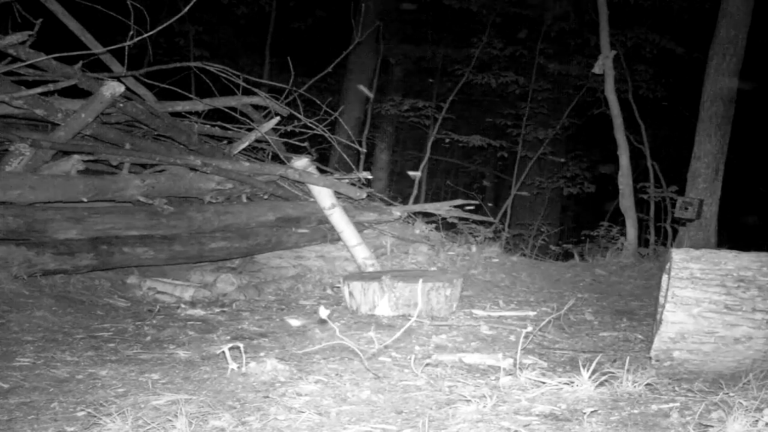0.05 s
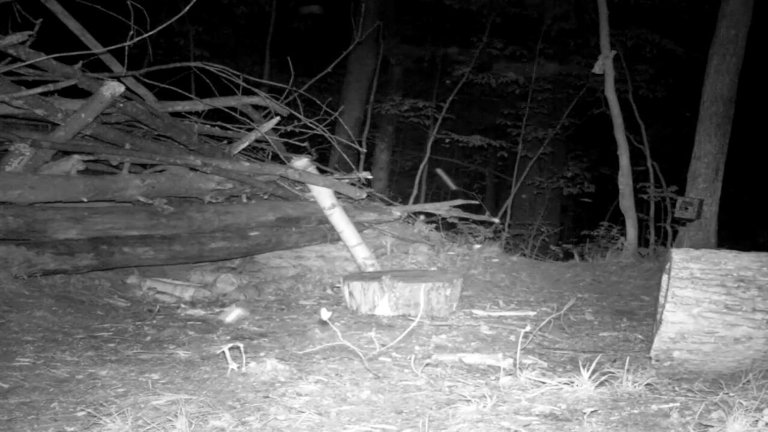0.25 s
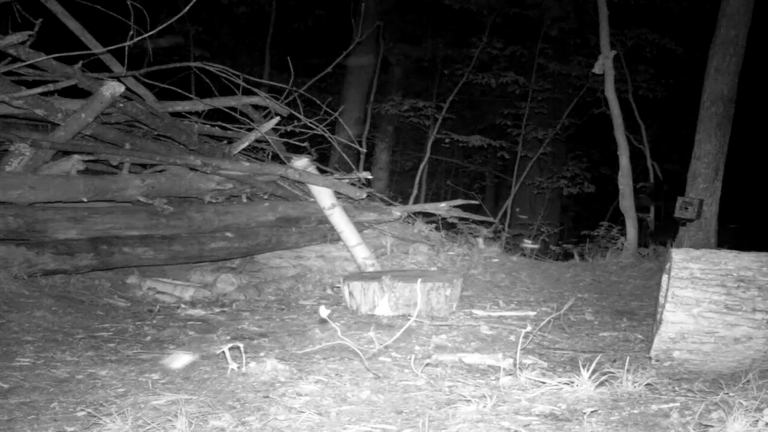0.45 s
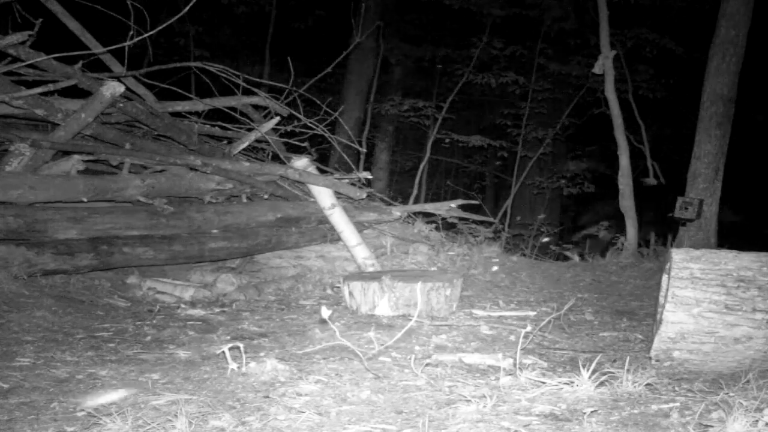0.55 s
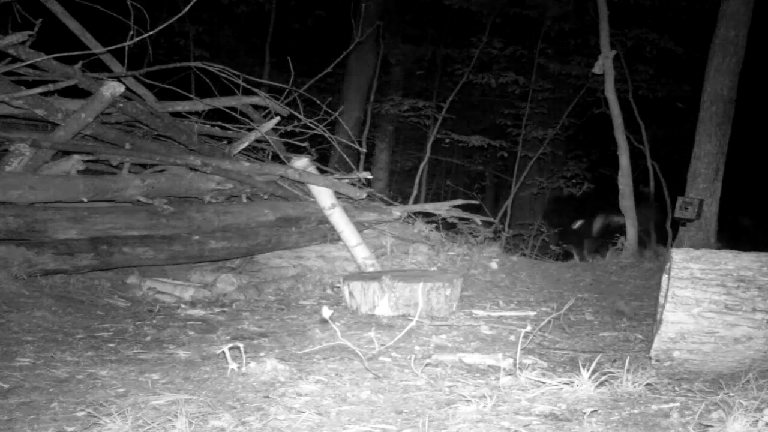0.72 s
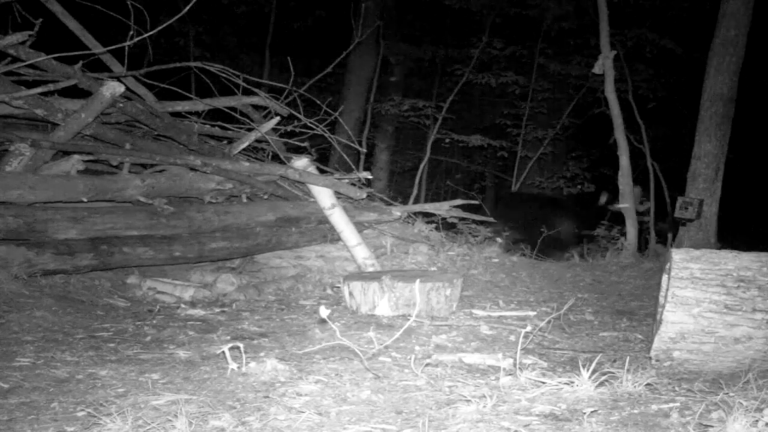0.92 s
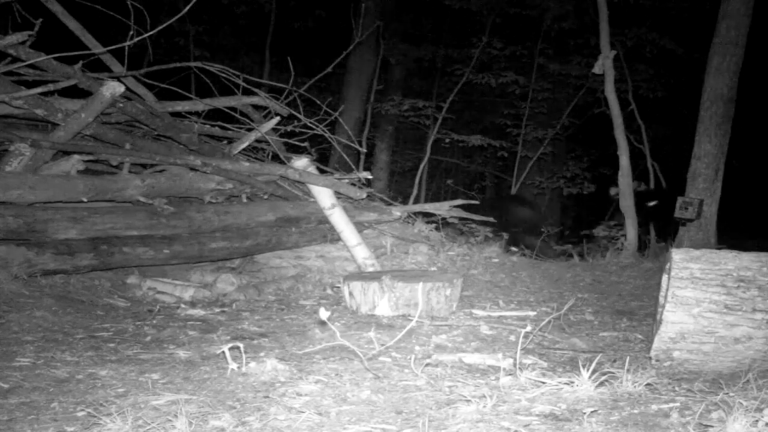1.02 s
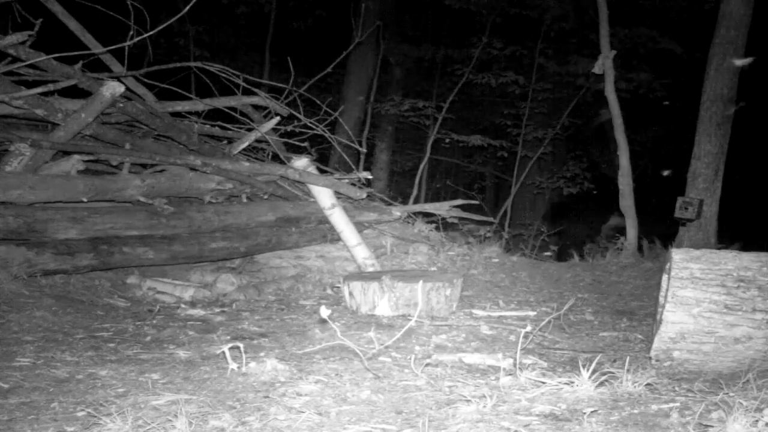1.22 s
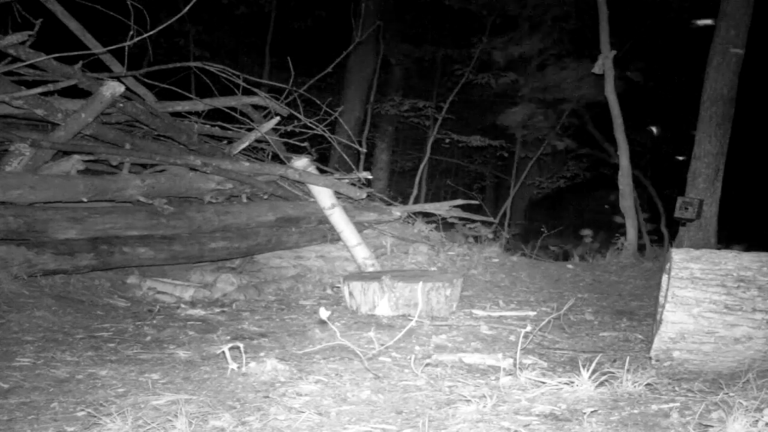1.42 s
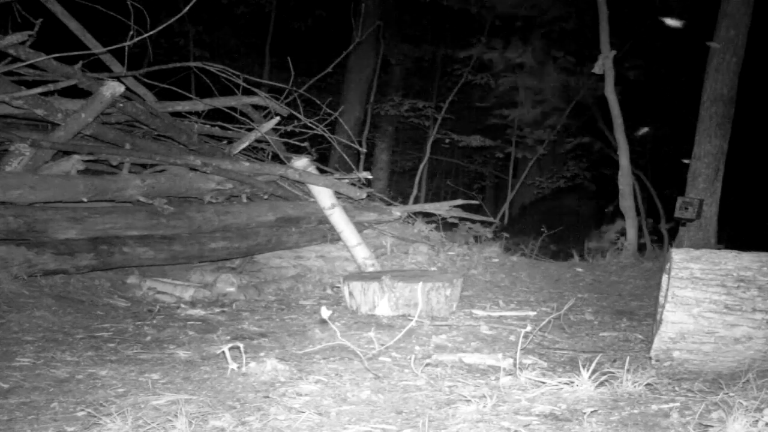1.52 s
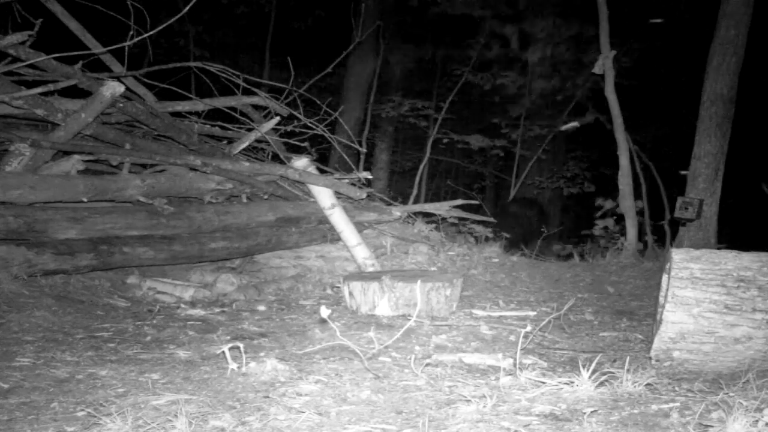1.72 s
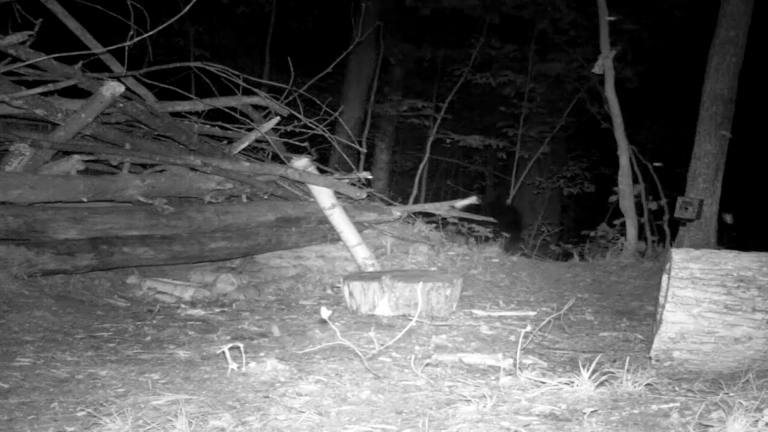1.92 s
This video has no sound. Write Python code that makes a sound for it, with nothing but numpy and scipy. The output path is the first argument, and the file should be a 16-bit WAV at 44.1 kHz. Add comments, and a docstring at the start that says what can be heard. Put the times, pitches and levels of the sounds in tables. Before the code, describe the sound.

One low, raspy bear growl, followed by snapping twigs, thudding paws and rustling leaves.

```python
"""Edge of a night forest: a bear gives one short rough growl and lunges through the brush.
Its vocal folds flap unevenly and ring the throat in the growl and in short grunts. Paws thud on
the ground and crush dry leaves, twigs snap, sticks knock and shaken branches rustle on.
Behind it: a steady insect chorus, a low rumble and the hiss of a small outdoor camera."""
import sys
import numpy as np
from scipy import signal
from scipy.fft import rfft, irfft
from scipy.io import wavfile

SR = 44100
rng = np.random.default_rng(int(sys.argv[2]) if len(sys.argv) > 2 else 0)


def transcribe(u):
    """Save the signal u as a 16-bit wav file named by the first command-line argument.

    u: samples, shape (n,) or (channels, n), limited to [-1, 1]; the rate is SR.
    q: integer samples, one column per channel.
    """
    v = np.clip(np.atleast_2d(u).T, -1, 1)
    q = np.round(v * 32767).astype(np.int16)
    wavfile.write(sys.argv[1], SR, q)


N = 85995
T = np.arange(N) / SR


def amp(db):
    """Decibels to gain."""
    return 10 ** (np.asarray(db) / 20)


def unit(x):
    """Scale to rms 1."""
    return x / np.sqrt(np.mean(x ** 2) + 1e-20)


def curve(rows, column=1):
    """One column of a time table, linearly interpolated."""
    rows = np.array(rows)
    return np.interp(T, rows[:, 0], rows[:, column])


def colour(x, spectrum, tilt_db_per_oct=0):
    """Minimum-phase filter of unit energy; the tilt acts above 1 kHz."""
    hz = np.maximum(abs(np.fft.fftfreq(8192, 1 / SR)), 5)
    freq_hz, gain_db = np.transpose(spectrum)
    tilt_db = tilt_db_per_oct * np.log2(np.maximum(hz, 1000))
    log_gain = np.log(amp(np.interp(np.log(hz), np.log(freq_hz), gain_db) + tilt_db))
    taps = np.fft.ifft(np.exp(signal.hilbert(log_gain).conj())).real[:4096]
    return signal.fftconvolve(x, taps / np.linalg.norm(taps))[:N]


def band(centre_hz, width_hz):
    """Noise in one steep resonance, rms 1; a random waver when centred on 0 Hz."""
    detune = 2 * (np.fft.rfftfreq(N, 1 / SR) - centre_hz) / width_hz
    return unit(irfft(rfft(rng.standard_normal(N)) / (1 + detune ** 2) ** 1.5, N))


def swell(start_s, rise_s, decay_s):
    """Linear rise, exponential fall."""
    age_s = T - start_s
    return np.clip(age_s / rise_s, 0, 1) * np.exp(-np.maximum(age_s - rise_s, 0) / decay_s)


def crackle(per_s, spread_db):
    """Random tiny clicks of uneven size, rms 1."""
    size = amp(spread_db * np.minimum(rng.exponential(1, N), 4))
    return unit(size * rng.choice([-1, 1], N) * (rng.random(N) < per_s / SR))


def insects():
    """Far insects trill in a high and a low chorus."""
    # chorus bands: centre_hz, width_hz, level_db
    chorus = [(3464, 140, -52.5), (3648, 450, -50.5), (2297, 490, -52)]
    return sum(amp(db + band(0, 45)) * band(hz, width_hz) for hz, width_hz, db in chorus)


def rumble_and_hiss():
    """Steady low rumble and camera hiss."""
    # noise spectrum: freq_hz, gain_db
    spectrum = [(20, 4.5), (65, 0.5), (160, -16), (280, -16.5), (500, -18), (780, -25), (1150, -15.5),
                (1700, -28.5), (2800, -26), (4600, -27), (7000, -29), (11000, -31.5), (15500, -34)]
    return amp(-44) * colour(rng.standard_normal(N), spectrum)


def leaves():
    """Crushed dry leaves break in bursts of small clicks."""
    # bursts: start_s, level_db, rise_s, decay_s, tilt_db_per_oct
    crunches = [(0.107, -42.5, 0.0022, 0.0061, 7), (0.247, -33.5, .001, 0.0085, 9),
                (0.26, -32, 0.0015, 0.015, 9.5), (.694, -32, 0.002, 0.013, 0.5),
                (0.708, -31, 0.0036, 0.016, -0.5), (0.931, -37.5, 0.024, 0.17, -7.5),
                (0.984, -31, 0.018, 0.01, -8.5), (1.203, -38.5, 0.0049, 0.01, -3),
                (1.273, -28, 0.028, 0.036, -0.5), (1.293, -39, 0.0055, 0.013, -2),
                (1.495, -41, 0.0087, 0.017, 0.5)]
    # leaf spectrum: freq_hz, gain_db
    spectrum = [(200, 9.5), (750, -13), (1200, 1), (2800, 5.5), (5500, 6), (9500, -4), (12500, -15.5),
                (15500, -12.5)]
    out = np.zeros(N)
    for start_s, level_db, rise_s, decay_s, tilt in crunches:
        clicks = swell(start_s, rise_s, decay_s) * crackle(per_s=7000, spread_db=3)
        out += amp(level_db) * colour(clicks, spectrum, tilt)
    return out


def vocal_folds(rate_hz, noise_share):
    """Folds flap unevenly; returns cycle count, air puffs and rough pulse train."""
    jitter, spread_db, puff_decay_cycles = 0.08, 2.5, 0.45
    cycles = np.cumsum(rate_hz * (1 + jitter * band(0, 150))) / SR
    flaps = np.diff(np.floor(cycles), prepend=0) * amp(spread_db * rng.standard_normal(N).clip(-1, 1))
    puffs = unit(0.9 + np.exp(-(cycles % 1) / puff_decay_cycles))
    voiced = np.sqrt(1 - noise_share) * unit(flaps - flaps.mean())
    breath = np.sqrt(noise_share) * puffs * rng.standard_normal(N)
    return cycles, puffs, voiced + breath


def grunts():
    """Short, half-voiced grunts, each with its own throat tuning."""
    # grunts: start_s, level_db, rise_s, decay_s, throat_freq_ratio
    calls = [(.22, -36, 0.037, 0.049, 0.89), (0.699, -36, 0.043, 0.015, 1),
             (.915, -38.5, 0.025, 0.036, 1.12), (.985, -36, 0.031, 0.0051, 1.12),
             (1.134, -43.5, 0.0085, 0.012, 0.98), (1.268, -29, 0.015, 0.022, 1.017),
             (1.314, -31, 0.0045, 0.029, .96), (1.729, -46.5, 0.024, 0.18, 1.02)]
    # throat spectrum: freq_hz, gain_db
    throat = [(40, -36), (130, 5), (220, -6), (320, 3.5), (400, 1), (490, -13.5), (580, -10.5), (760, -27),
              (1100, -16), (1550, -11), (2600, -73), (5000, -55)]
    _, _, drive = vocal_folds(rate_hz=66.98, noise_share=0.75)
    out = np.zeros(N)
    for start_s, level_db, rise_s, decay_s, ratio in calls:
        tuned = [(hz * ratio, db) for hz, db in throat]
        out += amp(level_db) * swell(start_s, rise_s, decay_s) * colour(drive, tuned)
    return out


def paws():
    """Each paw lands on soft ground with a low wavering boom and a dull scuff."""
    # paw falls: start_s, level_db, rise_s, decay_s, pitch_hz
    thuds = [(0.222, -30, 0.0043, 0.013, 146), (0.243, -27.5, 0.036, 0.017, 117.5),
             (.69, -34.5, 0.005, 0.077, 73.1), (0.911, -44.5, 0.0073, 0.041, 188.3),
             (0.974, -30.5, 0.03, 0.015, 85.2), (1.156, -39, 0.0034, 0.044, 155.4),
             (1.203, -35.5, 0.0026, 0.13, 119.3), (1.276, -32, 0.0055, 0.022, 161.4),
             (1.317, -33.5, 0.0054, 0.043, 183), (1.481, -41.5, 0.029, 0.029, 161.7),
             (1.555, -40.5, 0.022, 0.052, 204), (1.623, -36.5, 0.0042, 0.053, 84.8),
             (1.712, -43, 0.012, 0.11, 174.2), (1.8, -41, 0.023, 0.076, 162.9)]
    # scuff spectrum: freq_hz, gain_db
    ground = [(20, -33), (60, 15), (120, 4), (200, 5.5), (300, -10.5), (410, -17), (520, -13), (760, -43.5),
              (1500, -45), (4000, -81)]
    waver_hz = 28.4
    out = np.zeros(N)
    for start_s, level_db, rise_s, decay_s, pitch_hz in thuds:
        hz = (pitch_hz + waver_hz * band(0, 168)) * (T > start_s)
        boom = np.sqrt(2) * np.sin(2 * np.pi * np.cumsum(hz) / SR)
        scuff = amp(-4) * colour(rng.standard_normal(N), ground)
        out += amp(level_db) * swell(start_s, rise_s, decay_s) * (boom + scuff)
    return out


def twigs():
    """Each twig gives one sharp crack and a brief splintering, brighter if thinner."""
    # snaps: start_s, level_db, decay_s, tilt_db_per_oct
    snaps = [(.256, -27.5, 0.0015, -2), (0.686, -27.5, 0.0017, -0.5), (0.693, -19, 0.0002, 3),
             (0.696, -22.5, 0.00077, -2), (0.7167, -24, 0.001, 13), (0.719, -20.5, 0.0026, -0.5),
             (0.9475, -28, .001, -3), (1.2995, -28.5, 0.00053, -7)]
    # twig spectrum: freq_hz, gain_db
    spectrum = [(300, -13), (900, -10.5), (2000, 0), (3000, -15), (4800, 3.5), (7000, -0.5), (10000, -7.5),
                (11500, -23), (15000, -20)]
    out = np.zeros(N)
    for start_s, level_db, decay_s, tilt in snaps:
        crack = amp(12) * np.diff(1. * (T > start_s), prepend=0)
        splinters = swell(start_s, 0.0001, decay_s) * rng.choice([-1, 1], N)
        out += amp(level_db) * colour(crack + splinters, spectrum, tilt)
    return out


def throat_tones(mouth):
    """Narrow throat resonances sing in wavering, broken tones that rise as the mouth opens."""
    # resonances: shut_hz, open_hz, level_db
    resonances = [(181.4, 280, -5.5), (296.7, 408, -14), (430, 590, -22.5), (940, 1500, -27.5)]
    waver_hz, break_db = 14, 4
    out = np.zeros(N)
    for shut_hz, open_hz, level_db in resonances:
        hz = shut_hz + (open_hz - shut_hz) * mouth + waver_hz * band(0, 146)
        breaks = unit(amp(break_db * band(0, 83).clip(-2, 1)))
        out += amp(level_db) * breaks * np.sqrt(2) * np.sin(2 * np.pi * np.cumsum(hz) / SR)
    return out


def growl():
    """Slow fold pulses ring the throat and chop the air rasping in the mouth and past the teeth."""
    # fold pulses: time_s, rate_hz
    pitch = [(.31, 46.32), (.40, 52.61), (.45, 64.43), (.50, 77.6), (.55, 83.13), (.60, 77.2), (.66, 76.5)]
    # mouth: time_s, open_fraction
    opening = [(.33, 0.01), (.43, 0.48), (.51, 0.78), (.57, 0.69), (.62, 0.97)]
    # vocal effort: time_s, voice_db, rasp_db, hiss_db
    effort = [(.26, -61, -48.5, -54), (.31, -44, -40.5, -48), (.335, -27, -41, -49),
              (.385, -24, -38.5, -46), (.44, -24, -36, -39), (.505, -21, -35.5, -36.5),
              (.595, -22, -33, -36), (.632, -27, -37.5, -45), (.655, -60, -65, -49)]
    # spectra of open throat, mouth rasp and teeth hiss: freq_hz, gain_db
    throat = [(25, -10), (80, -5.5), (115, 2), (165, 5), (260, 3.5), (315, -7), (405, -5), (465, -15),
              (540, -7.5), (760, -32), (1300, -30), (2500, -68)]
    rasp_spectrum = [(500, -8), (780, -11.5), (1000, -1.5), (1090, -4.5), (1420, 4.5), (1680, -5),
                     (2050, -4.5), (2520, -6), (2880, -4.5), (3300, -18.5), (5000, -28.5)]
    teeth = [(1800, -19), (3200, 2.5), (4500, 1.5), (6500, 1.5), (9000, -8), (11500, -17), (15500, -21)]
    shut_ratio, throb_depth, fade_in_s, fade_out_s = 0.865, 0.35, 0.0045, 0.0089
    cycles, puffs, drive = vocal_folds(curve(pitch), noise_share=0.3)
    mouth = curve(opening)
    shut = colour(drive, [(hz * shut_ratio, db) for hz, db in throat])
    pulses = (1 - mouth) * shut + mouth * colour(drive, throat)
    beat = np.cos(2 * np.pi * cycles)
    tones = (1 + throb_depth * beat) * throat_tones(mouth)
    chest = amp(-9) * mouth * np.sqrt(2) * beat
    voice = (amp(-4) * pulses + tones + chest) * amp(curve(effort))
    rasp = colour(puffs * rng.standard_normal(N), rasp_spectrum) * amp(curve(effort, column=2))
    hiss = colour(puffs * rng.standard_normal(N), teeth) * amp(curve(effort, column=3))
    fade_in = np.clip((T - effort[0][0]) / fade_in_s, 0, 1)
    fade_out = np.clip((effort[-1][0] - T) / fade_out_s + 1, 0, 1)
    return (voice + rasp + hiss) * fade_in * fade_out


def branches():
    """Shaken foliage rustles on after the bear has pushed through."""
    # rustle envelope: time_s, level_db
    rustle = [(0, -107), (.66, -47.5), (.74, -43.5), (.83, -47.5), (.89, -54.5), (.97, -41.5),
              (1.06, -47.5), (1.18, -50.5), (1.25, -37), (1.33, -38), (1.43, -37), (1.55, -41), (1.67, -43),
              (1.76, -46), (1.95, -46.5)]
    # foliage spectrum: freq_hz, gain_db
    spectrum = [(250, -14), (750, -12.5), (1200, -1), (2000, -5), (3200, -3), (4800, 0), (7500, -1),
                (10000, -9), (12000, -11), (15500, -13)]
    flutter_db = 1.25
    clicks = crackle(per_s=12000, spread_db=1)
    return colour(clicks * amp(curve(rustle) + flutter_db * band(0, 84)), spectrum)


def sticks():
    """Loose sticks knock, ringing briefly in a main and a lower, hollow mode."""
    # knocks: start_s, level_db, pitch_hz
    knocks = [(1.136, -41.5, 1110), (1.407, -38, 1600), (1.846, -44.5, 1500)]
    width_hz, hollow_ratio = 420, 0.356
    out = np.zeros(N)
    for start_s, level_db, pitch_hz in knocks:
        main = band(pitch_hz, width_hz)
        hollow = amp(-4) * band(pitch_hz * hollow_ratio, width_hz * hollow_ratio)
        out += amp(level_db) * swell(start_s, rise_s=0.0081, decay_s=0.0037) * (main + hollow)
    return out


def ground_echoes(x):
    """Add close reflections from ground and logs, normalised for energy."""
    # reflections: delay_s, level_db
    echoes = [(.0052, -15), (0.0108, -22), (0.0203, -23)]
    reflected = sum(amp(db) * np.interp(T - delay_s, T, x, left=0) for delay_s, db in echoes)
    return (x + reflected) / np.sqrt(1 + sum(amp(db) ** 2 for _, db in echoes))


def trunk_echoes(x, t60_s):
    """Trunks scatter the sound into a tail of echoes."""
    taps = crackle(per_s=2500, spread_db=-0.5) * swell(0.012, 0.052, t60_s / np.log(1000))
    return signal.fftconvolve(x, taps / np.linalg.norm(taps))[:N]


def scene():
    """Bear and brush, with faint echoes, over the night background."""
    near = ground_echoes(growl()) + grunts() + paws() + leaves() + twigs() + branches() + sticks()
    return (near + amp(-18) * trunk_echoes(near, t60_s=0.84) + insects() + rumble_and_hiss())[None]


def record(dry):
    """The camera's band limit: a steep low-pass."""
    cutoff_hz = 15550
    taps = signal.firwin(311, cutoff_hz, window=("kaiser", 9), fs=SR)
    return signal.oaconvolve(dry, taps[None], "same")


dry = scene()
out = record(dry)
transcribe(out)
```